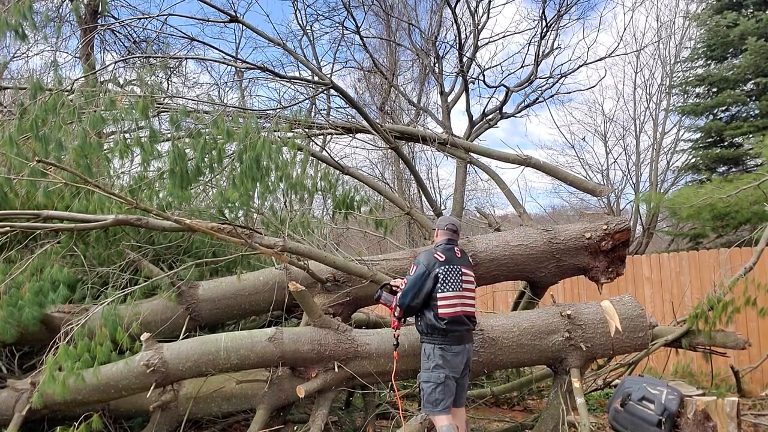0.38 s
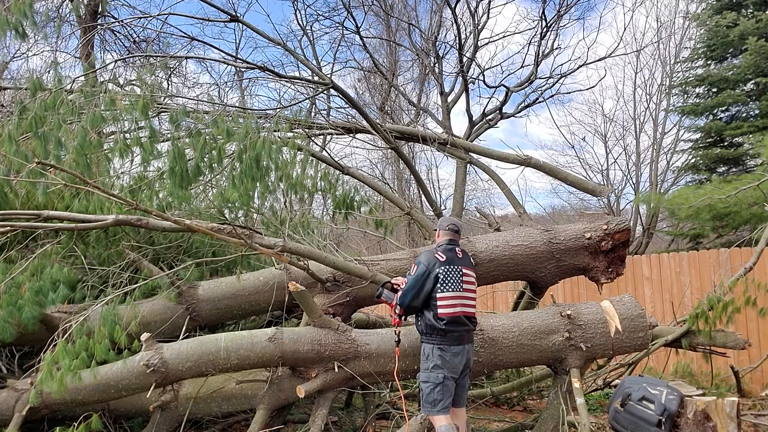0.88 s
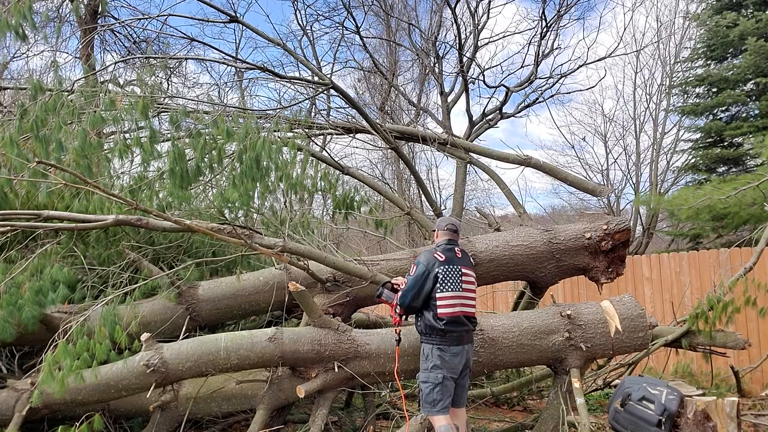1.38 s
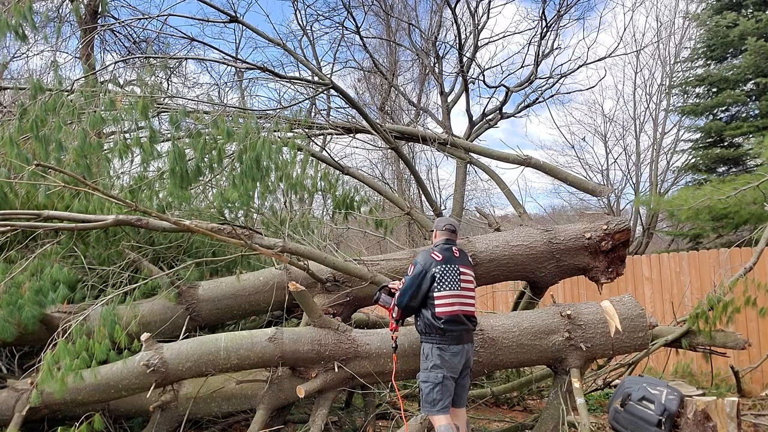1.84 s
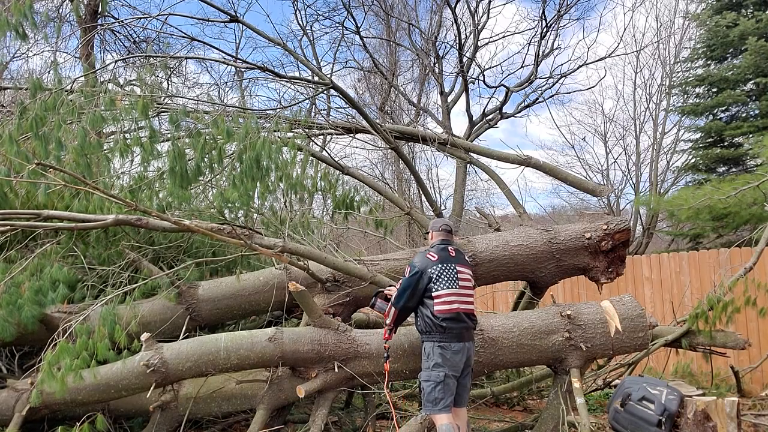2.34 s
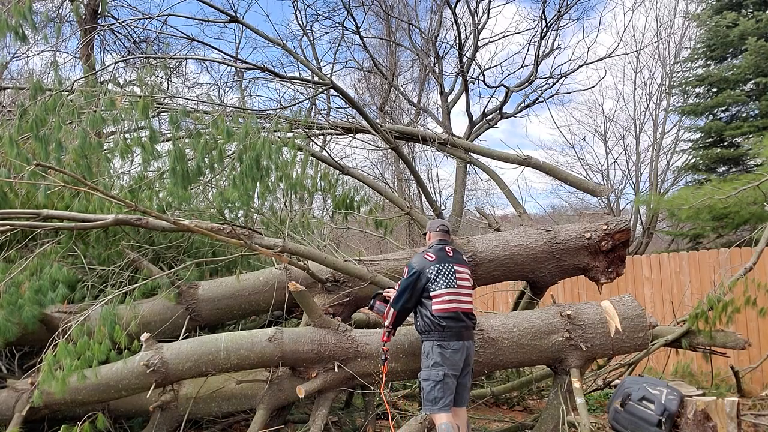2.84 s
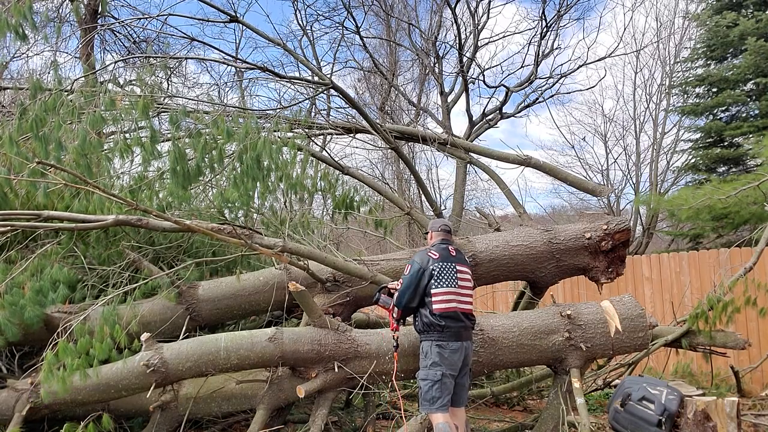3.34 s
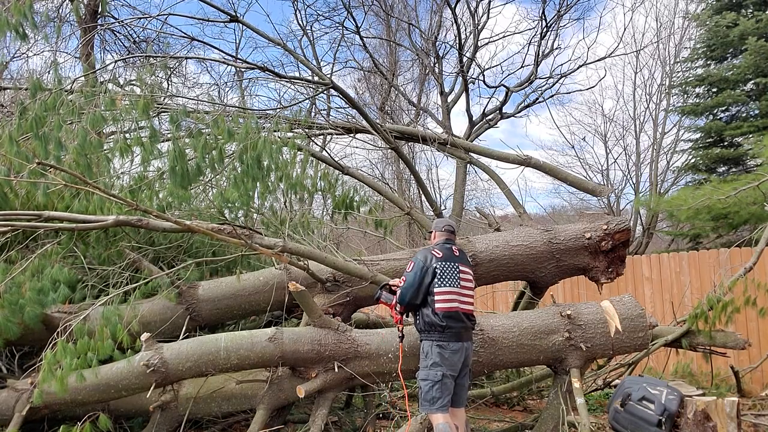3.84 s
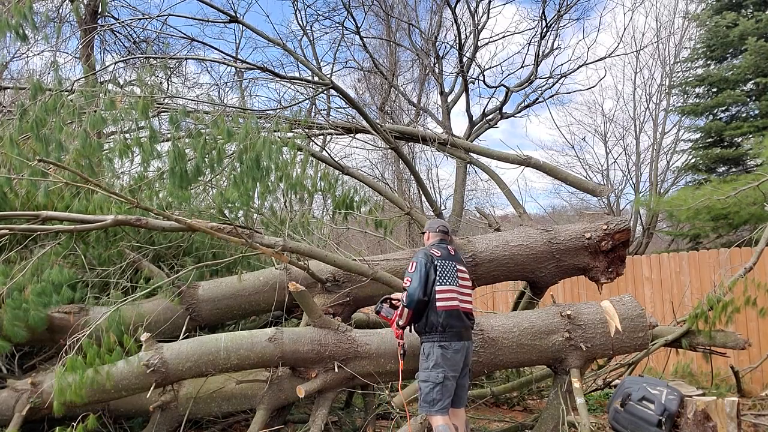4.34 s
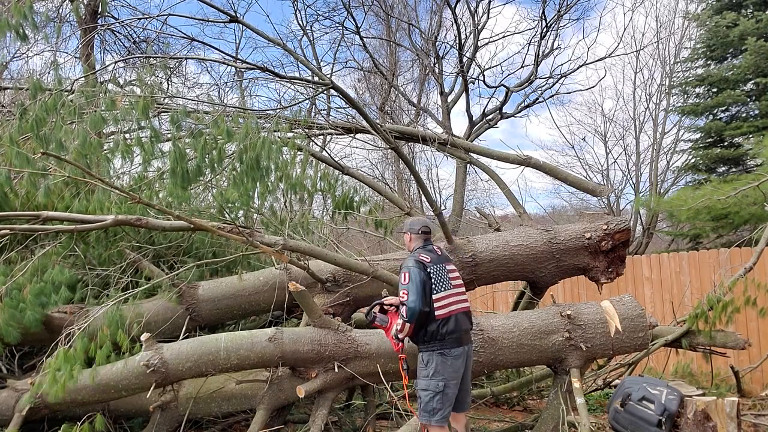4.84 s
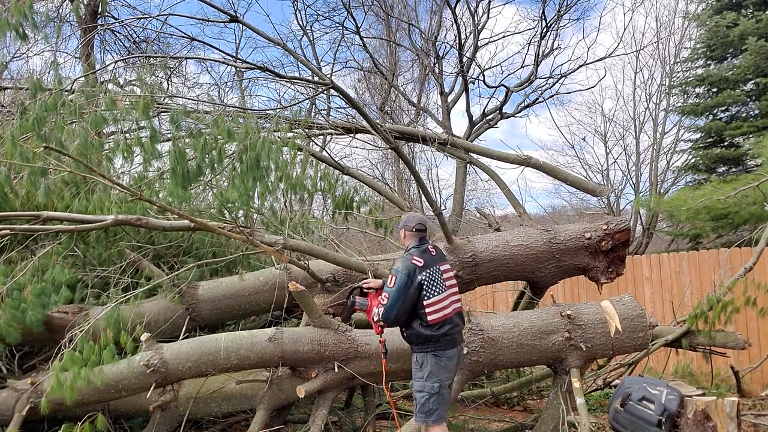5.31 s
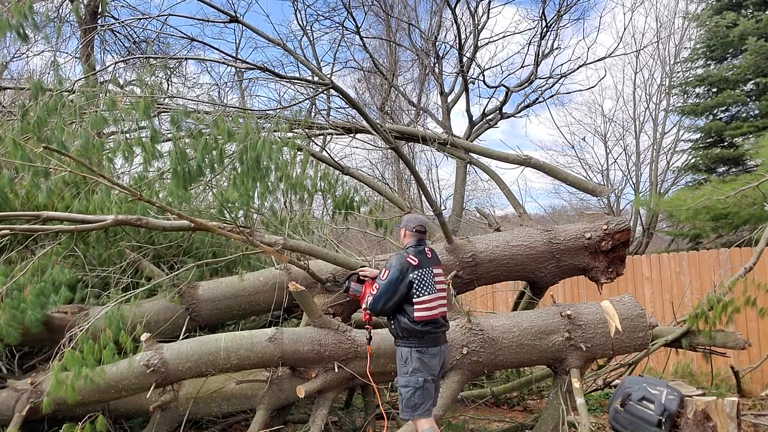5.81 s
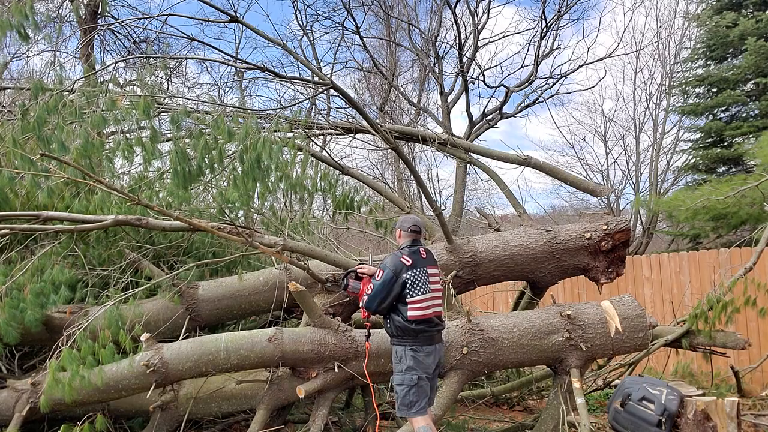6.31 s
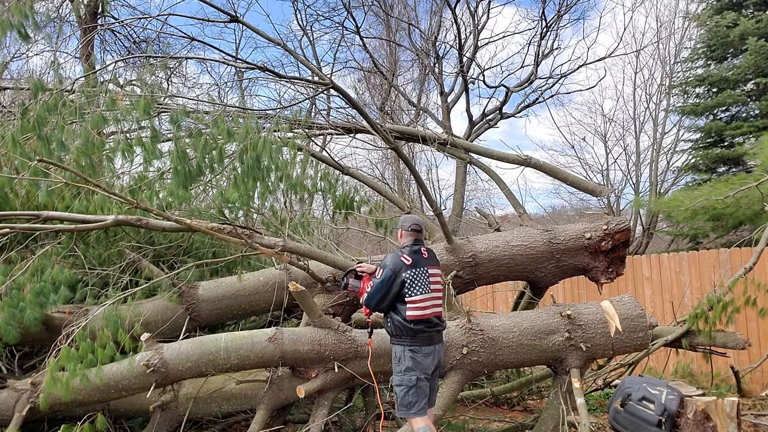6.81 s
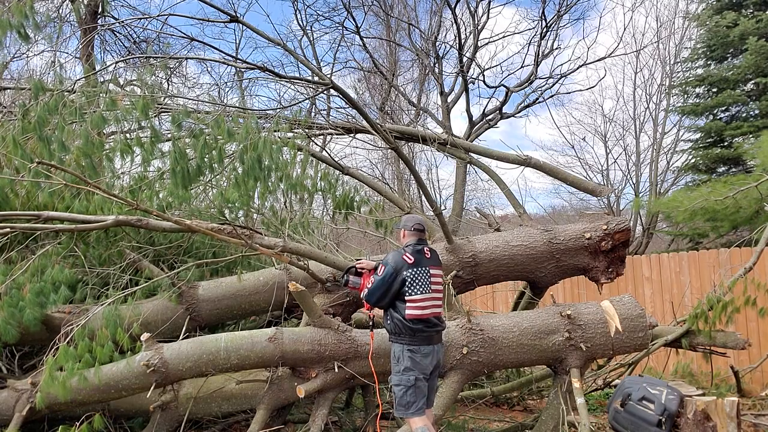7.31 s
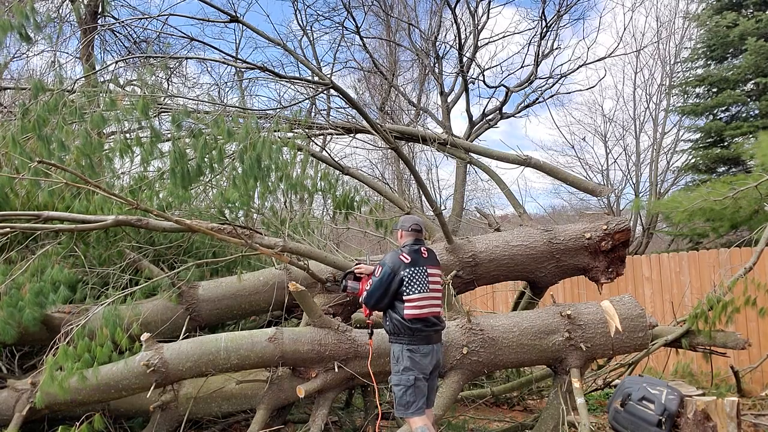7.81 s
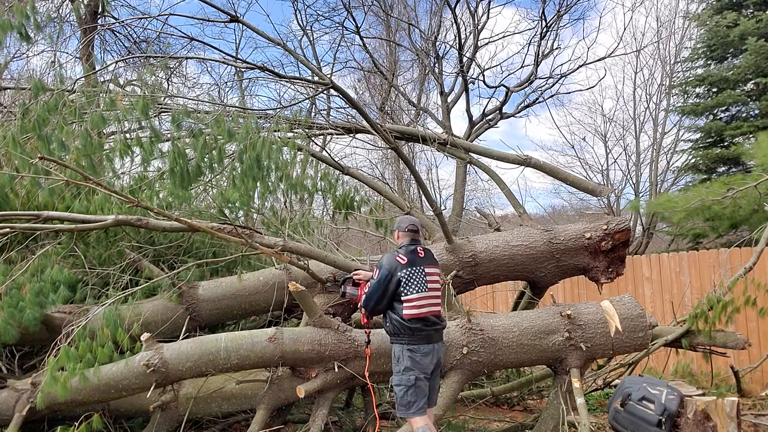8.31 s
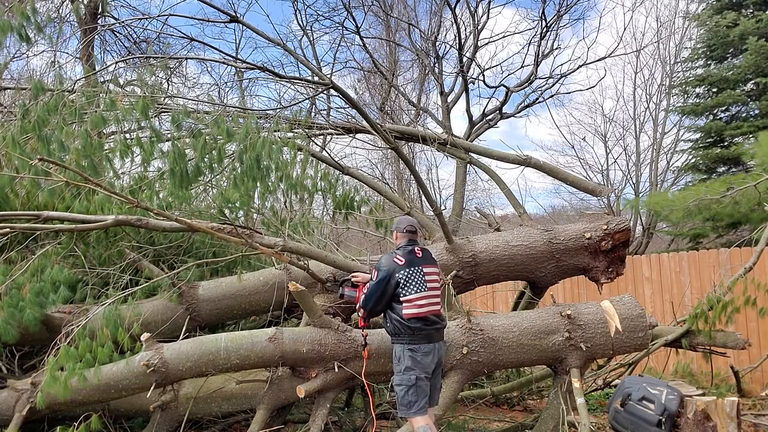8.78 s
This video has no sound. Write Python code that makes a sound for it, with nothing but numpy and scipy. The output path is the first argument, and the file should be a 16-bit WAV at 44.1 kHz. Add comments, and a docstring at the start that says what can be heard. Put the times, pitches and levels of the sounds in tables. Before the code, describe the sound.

Continuous electric saw noise outdoors, dry, with only tiny reflections from ground and logs. First comes a labouring cut with falling pitch, then about two seconds of higher, clearer, hissing free running, then another loaded cut where the branch rings and chatters. Small twigs crackle on the chain, a generator rumbles quietly underneath, and a low far engine revs up last. The stereo microphone stands some metres away.

```python
"""A yard: a mains electric chainsaw at full throttle, some metres off, slows while it bites into a branch,
races free between two cuts and bites again. Sprocket, gears and motor are sines locked to one shaft speed;
cutters' rasp, chain rattle and fan hiss are shaped noise, and single catches ring the branch's resonances.
A small generator hums nearby on two tones over a low rumble; the log shakes, chips snap on the chain,
and a far engine, one climbing tone, revs at the end."""
import sys
import numpy as np
from scipy import signal
from scipy.fft import rfft, irfft, next_fast_len
from scipy.io import wavfile
from scipy.ndimage import uniform_filter1d, map_coordinates

SR = 44100
rng = np.random.default_rng(int(sys.argv[2]) if len(sys.argv) > 2 else 0)


def transcribe(signal):
    """Save signal, clipped to [-1, 1], as a 16-bit WAV file at the path in sys.argv[1]."""
    frames = np.atleast_2d(signal).T
    limited = np.clip(frames, -1, 1)
    pcm = np.round(limited * 32767).astype(np.int16)
    wavfile.write(sys.argv[1], SR, pcm)


def nominal_scale(level):
    """Amplitude ratio for a level in decibels (scalar or array-like)."""
    x = np.asarray(level, float) / 20
    return 10 ** x


N = 403956
TIME = np.arange(N) / SR
WHINE_PER_MOTOR_TURN, GEAR_RATIO, SPROCKET_TEETH, DRIVE_LINKS = 29, 40 / 9, 6, 54

# motor speed before smoothing [t/s, turns/s]
MOTOR_SPEED = [(0, 409.5), (.2, 402), (.45, 387), (.75, 374.5), (.93, 372), (1.05, 366), (1.3, 365),
               (2.15, 350), (2.65, 367.5), (3.03, 373), (3.35, 364.5), (3.6, 363), (3.83, 359.5),
               (4.1, 399.5), (4.33, 422), (4.6, 434.5), (5.1, 443), (5.92, 445.5), (6.2, 433), (6.45, 404),
               (6.8, 381), (6.95, 369.5), (7.25, 363.5), (7.42, 355), (7.65, 353), (8.0, 355.5),
               (8.22, 362), (8.62, 365.5), (8.85, 361.5), (9.16, 352)]
# depth of the second cut, into a branch that rings [t/s, depth 0-1]
SECOND_CUT_DEPTH = [(6.6, 0.1), (7.2, 0.8), (8.3, 0.87), (8.7, 0.27)]
# whine fades as the bar leaves and enters the wood [t/s, half width to 1/e of the dip/s, dip/dB]
WHINE_FADES = [(3.76, .11, 16), (6.4, .15, 13)]
# sprocket tooth lines, swelling in turn [t/s, tooth rate level/dB, 2nd multiple level/dB, 3rd multiple level/dB]
TOOTH_LINES = [(0, -29.5, -26, -33), (.75, -34.5, -27.5, -34), (1.25, -38.5, -28, -55),
               (1.85, -41, -38, -32.5), (2.15, -45, -29.5, -35.5), (3.1, -43.5, -28, -31.5),
               (3.8, -40, -35.5, -34.5), (4.2, -30, -25, -33.5), (4.5, -35.5, -22, -30.5),
               (4.85, -27.5, -22, -36), (5.05, -26, -31, -33), (5.3, -35, -28.5, -32.5),
               (5.6, -29, -42, -33.5), (5.85, -25.5, -27.5, -28), (6.2, -27.5, -24.5, -35.5),
               (6.55, -35.5, -35.5, -30.5), (6.75, -39, -31, -33), (7.0, -41.5, -31.5, -39),
               (7.7, -51, -33.5, -51), (8.5, -60, -35, -34.5), (8.8, -54, -26.5, -34),
               (9.16, -42, -26, -36)]
# weaker sprocket lines [multiple of sprocket turn, level/dB]
SPROCKET_LINES = [(7, -48), (13, -50), (16, -50), (30, -44), (36, -46)]
# two lines that come and go [t/s, level at 8x sprocket turn/dB, level at 24x/dB]
CUTTER_LINES = [(1.702, -58, -54), (2.3, -37, -40), (3.1, -36.5, -41), (3.7, -60, -38), (4.2, -48, -45),
                (6, -41, -47), (7.4, -46, -52), (8.5, -48, -50), (8.9, -48, -40)]
# weaker motor lines [multiple of motor turn, loaded level/dB, free level/dB]
MOTOR_LINES = [(1, -64, -49), (8, -56, -46), (9, -48, -43), (14, -56, -43), (18, -54, -50), (25, -66, -53),
               (28, -68, -52), (30, -60, -49)]
# spectrum of cutters in wood [f/Hz, relative level per Hz/dB]
RASP_SPECTRUM = [(240, -56), (400, -22.5), (480, -9), (580, -3.5), (790, -4.5), (947, -3), (1130, -3),
                 (1500, -3.5), (2280, -11.5), (3500, -13.5), (4550, -24), (7700, -120)]
# spectrum of the chain's rattle [f/Hz, relative level per Hz/dB]
RATTLE_SPECTRUM = [(1060, -33), (1800, -3), (2330, -5), (3010, -3.5), (4500, -6), (4930, -5), (6980, -5.5),
                   (9890, -17), (11000, -13), (14300, -22), (22000, -120)]
# spectrum of the fan [f/Hz, relative level per Hz/dB]
HISS_SPECTRUM = [(7000, -40), (10000, -17), (10400, 6), (12500, 13.5), (14000, 10.5), (15700, 17),
                 (16200, -60)]
# resonances of the cut branch [f/Hz, width/Hz, relative level/dB]
BRANCH_MODES = [(892, 58, 2), (1303, 80, -3), (1644, 150, -4.5), (2600, 250, -10), (3190, 70, -6.5)]
# near echoes off the logs and the ground [delay/s, gain]
ECHOES = [(.00045, -0.071), (.0016, -0.0084)]
# shaking of the log under the bar [t/s, level/dB]
LOG_LEVEL = [(0, -53), (3.75, -56.5), (7.5, -49), (9.16, -52.5)]
# generator [t/s, firing tone level/dB, 2nd multiple level/dB]
GENERATOR_LEVELS = [(0, -43, -48.5), (1.94, -47, -52), (3.24, -38, -43), (4.0, -42, -46.5), (4.8, -53, -50),
                    (5.5, -49, -49.5), (5.9, -50, -45), (8.24, -48, -53), (9.16, -47, -54)]
# spectrum of the generator's rumble [f/Hz, relative level per Hz/dB]
RUMBLE_SPECTRUM = [(13, -36), (22, -4), (54, 4.5), (113, 2), (137, -9), (166, -2), (220, -31), (290, -59),
                   (480, -120)]
# chips and twigs on the chain [t/s, crackle gain/dB, body gain over crackle/dB]
SNAPS = [(0.9594, -18, 6), (4.354, -11, 3), (4.384, -6.5, -8), (4.3874, -10, -2), (4.3904, -13, -5),
         (5.1494, -19, 4), (6.0344, -20.5, 0), (8.5599, -19.5, 6), (8.8294, -21.5, 8)]
# far engine [t/s, f/Hz, level/dB]
FAR_ENGINE = [(7.9, 62, -60), (8.5, 67.3, -46), (9.0, 73.2, -43), (9.16, 73.8, -47)]
# stereo likeness of the noises [f/Hz, left-right correlation]
LIKENESS = [(100, 1), (200, 0.91), (400, 1), (950, 0.8), (2400, 0.84), (4400, 0.73), (8000, 0.38),
            (15000, 0.11)]
# port colour [f/Hz, left minus right/dB]
PORT_TILT = [(300, -1), (700, 0), (6000, 1.5), (10000, 2), (15000, -1.3)]


def unit(x):
    """Bring to rms 1."""
    return x / np.sqrt(np.mean(x ** 2) + 1e-20)


def along(points, f_hz):
    """Read (Hz, value) points on a log frequency axis."""
    hz, value = np.transpose(points)
    return np.interp(np.log(f_hz + 1), np.log(hz + 1), value)


def curves(rows):
    """One value per sample for each column after the time."""
    t_s, *columns = np.transpose(rows)
    return [np.interp(TIME, t_s, column) for column in columns]


def wobble(rate_hz):
    """Smooth random curve with rate_hz knots a second."""
    knots = rng.standard_normal(int(N * rate_hz / SR) + 4)
    return map_coordinates(knots, [TIME * rate_hz])


def between(loaded, racing, share):
    """Go from the loaded value to the free-running one."""
    return loaded + (racing - loaded) * share


def filtered(x, response):
    """Multiply the spectrum of x by a response of frequency."""
    m = next_fast_len(N + 8192)
    return irfft(rfft(x, m) * response(np.fft.rfftfreq(m, 1 / SR)), m)[..., :N]


def rush(spectrum, patchy_db, banded_db=0):
    """Stereo noise of rms 1 with brief random patches and narrow bands that last about a second."""
    grid = signal.stft(rng.standard_normal((2, N)), nperseg=512)[2]

    def field(bins, frames):
        rough = rng.standard_normal(grid.shape[1:])
        return unit(uniform_filter1d(uniform_filter1d(rough, bins, 0), frames, 1))

    gain_db = patchy_db * field(8, 10) + banded_db * field(2, 160)
    pair = signal.istft(grid * nominal_scale(gain_db), nperseg=512)[1][:, :N]

    def mid_side_response(f_hz):
        angle = np.arccos(np.clip(along(LIKENESS, f_hz), 0, 1)) / 2
        return nominal_scale(along(spectrum, f_hz)) * [np.cos(angle), np.sin(angle)]

    mid, side = filtered(pair, mid_side_response)
    return unit(np.array([mid + side, mid - side]))


def tone(turns, level_db, flutter_db, rate_hz, spread_rad=0.16):
    """Sine of rms level_db before flutter; its phase drifts between the two ports."""
    lag = spread_rad * wobble(rate_hz / 4) * np.array([[1], [-1]])
    phase = 2 * np.pi * (turns + rng.random())
    return np.sqrt(2) * nominal_scale(level_db + flutter_db * wobble(rate_hz)) * np.sin(phase + lag)


def shaft():
    """Motor turns so far from the smoothed speed, and freedom from load (0 loaded, 1 racing)."""
    speed_hz = uniform_filter1d(curves(MOTOR_SPEED)[0], size=SR // 8)
    free = np.clip((speed_hz - 365) / 80, 0, 1)
    return np.cumsum(speed_hz) / SR, free


def chain_loops(motor):
    """Rounds of the chain: the sprocket moves one drive link a tooth."""
    return motor / GEAR_RATIO * SPROCKET_TEETH / DRIVE_LINKS


def motor_whine(shaken, motor, free):
    """Whine of fan blades or commutator at a fixed multiple of motor turn, throbbing as the chain drags twice a
    round."""
    # full strength well before top speed
    whine_db = between(-41.5, -33, np.clip(3.8 * free, 0, 1)) + 1.2 * wobble(3)
    for t_s, width_s, dip_db in WHINE_FADES:
        whine_db -= dip_db * np.exp(-((TIME - t_s) / width_s) ** 2)
    throb_db = 2.3 * np.sin(2 * np.pi * 2 * chain_loops(motor))
    return tone(WHINE_PER_MOTOR_TURN * shaken, whine_db + throb_db, flutter_db=2.2, rate_hz=25, spread_rad=.55)


def sprocket_lines(motor):
    """Teeth and cutters sing at whole multiples of the sprocket's turn."""
    sprocket = motor / GEAR_RATIO
    out = np.zeros((2, N))
    for k, level_db in enumerate(curves(TOOTH_LINES), 1):
        turns = k * (SPROCKET_TEETH * sprocket + 0.015 * wobble(50))
        out += tone(turns, level_db, flutter_db=1.1, rate_hz=30, spread_rad=0.11)
    for k, level_db in SPROCKET_LINES:
        out += tone(k * (sprocket + .0015 * wobble(50)), level_db, flutter_db=3.5, rate_hz=4)
    for k, level_db in zip((8, 24), curves(CUTTER_LINES)):
        out += tone(k * sprocket, level_db, flutter_db=2.5, rate_hz=8)
    return out


def motor_lines(shaken, free):
    """The motor sings at whole multiples of its turn, at levels set by the load."""
    out = np.zeros((2, N))
    for k, loaded_db, free_db in MOTOR_LINES:
        out += tone(k * shaken, between(loaded_db, free_db, free), flutter_db=4, rate_hz=5, spread_rad=.5)
    return out


def lines(motor, free):
    """All tonal lines follow one shaft; biting wood shakes it and blurs the high ones."""
    shake_turns = .002 + .004 * (1 - free) + .007 * curves(SECOND_CUT_DEPTH)[0]
    shaken = motor + shake_turns * wobble(60)
    return motor_whine(shaken, motor, free) + sprocket_lines(motor) + motor_lines(shaken, free)


def rasp(bite):
    """Cutters tear wood: broad noise swelling with each bite."""
    return nominal_scale(-26.5) * unit(nominal_scale(1.05 * bite) * rush(RASP_SPECTRUM, patchy_db=0.95, banded_db=2.05))


def branch_response(f_hz):
    """Damped resonances of the branch, alternating in sign."""
    total = 0
    for k, (center, width, level_db) in enumerate(BRANCH_MODES):
        damping = 1j * f_hz * width
        total = total + (-1) ** k * nominal_scale(level_db) * damping / (center ** 2 - f_hz ** 2 + damping)
    return total


def branch_knock(bite):
    """Single cutters catch and ring the branch while the bar hops unevenly in the kerf."""
    blows = rng.uniform(-1, 1, N) * (rng.random(N) < 3000 / SR)
    hops = np.cumsum(48 + 11 * wobble(30)) / SR
    # each hop bites at once and fades
    chatter = np.exp(-5.5 * (hops % 1)) * nominal_scale(1.8 * wobble(40))
    force = (.25 + unit(chatter)) * nominal_scale(1.3 * bite)
    return unit(filtered(force * blows, branch_response))


def chain_rattle(free, bite, gusts_db, grit):
    """Links rattle on the bar, a little louder running free."""
    level_db = between(-27, -24.5, free) + .5 * wobble(2.11)
    level_db = level_db + 0.28 * gusts_db + 0.45 * bite + 1.05 * grit
    return nominal_scale(level_db) * rush(RATTLE_SPECTRUM, patchy_db=1.0, banded_db=1.78)


def fan_hiss(free, gusts_db, grit):
    """The fan's treble noise rises with speed and gusts."""
    level_db = between(-36, -30, free) + 1.1 * wobble(1.81)
    return nominal_scale(level_db + gusts_db + 1.3 * grit) * rush(HISS_SPECTRUM, patchy_db=1.6)


def cutting(motor, free):
    """Rasp, branch, rattle and hiss share uneven bites, gusts and grit."""
    # four bites a round of the bar
    regular = 1.13 * np.sin(2 * np.pi * 4 * chain_loops(motor))
    bite = (1 - .7 * free) * (regular + 0.75 * wobble(90))
    grit = wobble(700)
    # chips and air pass the fan in puffs
    gusts_db = (0.69 + 1.1 * free) * wobble(10) + 0.86 * wobble(35)
    deep = curves(SECOND_CUT_DEPTH)[0]
    out = nominal_scale(-2.5 * deep) * rasp(bite)
    out += nominal_scale(-28.5) * (0.25 * (1 - free) + 0.8 * deep) * branch_knock(bite)
    out += nominal_scale(-1.2 * deep) * chain_rattle(free, bite, gusts_db, grit)
    return out + fan_hiss(free, gusts_db, grit)


def echo_comb(f_hz):
    """Near echoes off logs and ground comb the spectrum."""
    return 1 + sum(gain * np.exp(-2j * np.pi * f_hz * delay_s) for delay_s, gain in ECHOES)


def log():
    """The log under the cut answers with a weak low roughness."""
    spectrum = [(130, -40), (200, -7.0), (400, 5.0), (600, -41)]  # f/Hz, relative level/dB
    return nominal_scale(curves(LOG_LEVEL)[0] + 2.0 * wobble(12)) * rush(spectrum, patchy_db=2.5)


def generator(free):
    """One firing per mains cycle: two tones over a rumble, a little faster when the saw runs free."""
    first_db, second_db = curves(GENERATOR_LEVELS)
    turns = np.cumsum(59.6 + 0.893 * free + 0.35 * wobble(4)) / SR
    hum = tone(turns, first_db, flutter_db=2.0, rate_hz=9, spread_rad=.095)
    hum += tone(2 * turns, second_db, flutter_db=2.5, rate_hz=7, spread_rad=.095)
    return hum + nominal_scale(-49.5 + 1.9 * wobble(2.45)) * rush(RUMBLE_SPECTRUM, patchy_db=0.7)


def snaps():
    """Each chip is a short bright crackle with a duller body."""
    out, t = np.zeros((2, N + SR)), np.arange(SR // 20) / SR
    bright = signal.butter(2, 4000, "hp", fs=SR)
    dull = signal.butter(2, [1500, 4500], "bp", fs=SR)
    envelope = np.exp(-t / 0.0021) * (1 - np.exp(-t / .0006))
    for t_s, gain_db, body_db in SNAPS:
        burst = rng.standard_normal((3, len(t))) * envelope
        # row 0 common to both ports, rows 1 and 2 one port each
        crackle = signal.lfilter(*bright, burst[0] + 0.65 * burst[1:])
        body = nominal_scale(body_db) * signal.lfilter(*dull, burst[0])
        start = round(t_s * SR)
        out[:, start:start + len(t)] += nominal_scale(gain_db) * (crackle + body)
    return out[:, :N]


def far_engine():
    """One low tone that climbs at the end."""
    speed_hz, level_db = curves(FAR_ENGINE)
    sound = tone(np.cumsum(speed_hz) / SR, level_db, flutter_db=-1.0, rate_hz=7, spread_rad=0.08)
    return sound * (TIME > FAR_ENGINE[0][0])


def scene():
    """Saw and engines in the open air; near echoes comb the saw's noise."""
    motor, free = shaft()
    saw = lines(motor, free) + filtered(cutting(motor, free), echo_comb) + log() + snaps()
    return saw + generator(free) + far_engine()


def low_pass(x):
    """Removes everything above the highest recorded frequency."""
    return signal.sosfilt(signal.butter(12, 17090, fs=SR, output="sos"), x)


def record(dry):
    """Two microphone ports differ a little in colour and keep nothing above their band limit."""
    top_hz = 15750

    def port_response(f_hz):
        tilt_db = along(PORT_TILT, f_hz) / 2 * np.array([[1], [-1]])
        return nominal_scale(tilt_db) * (f_hz < top_hz)

    return low_pass(filtered(dry, port_response))


dry = scene()
out = record(dry)
transcribe(out)
```